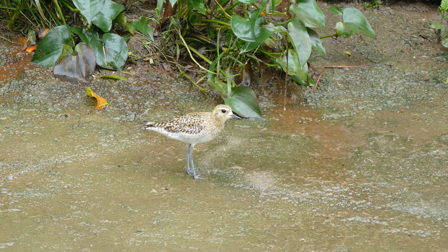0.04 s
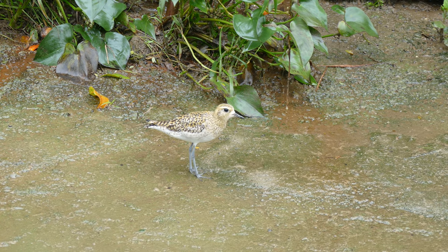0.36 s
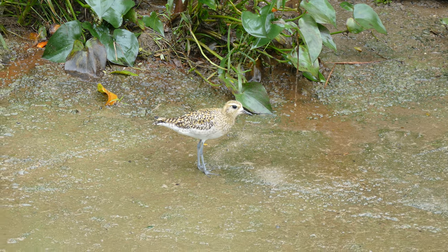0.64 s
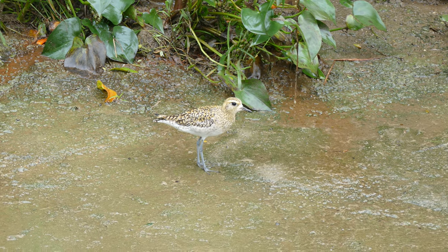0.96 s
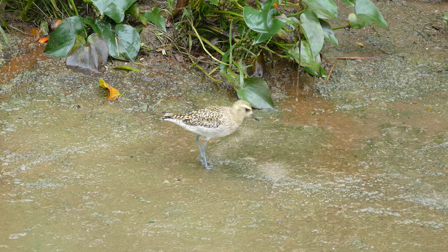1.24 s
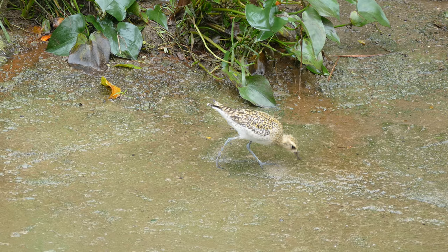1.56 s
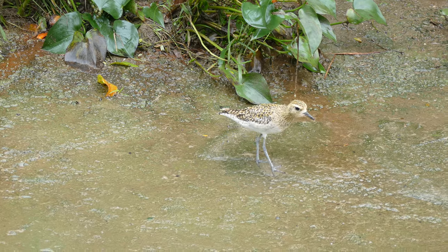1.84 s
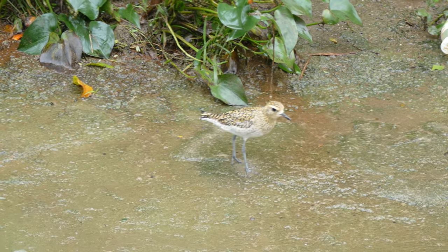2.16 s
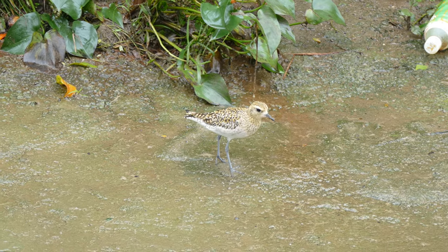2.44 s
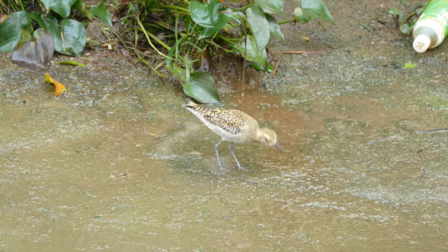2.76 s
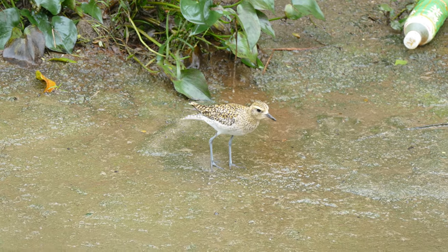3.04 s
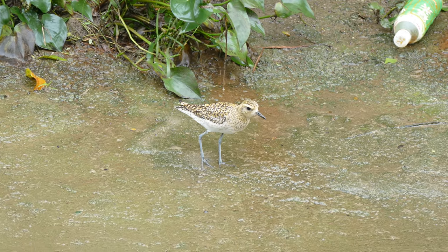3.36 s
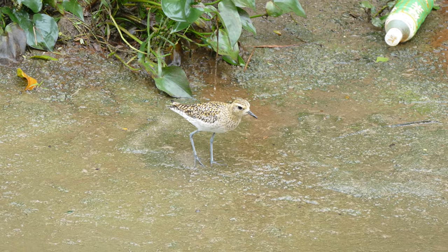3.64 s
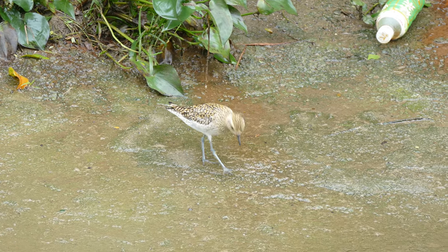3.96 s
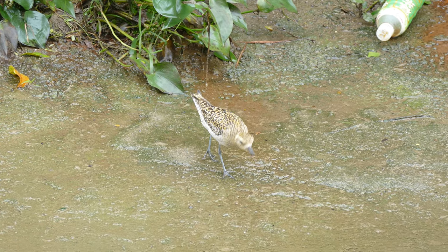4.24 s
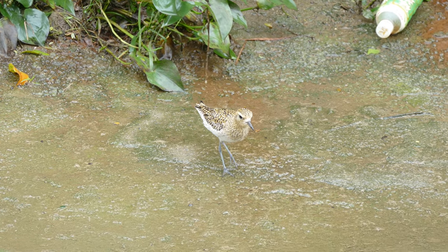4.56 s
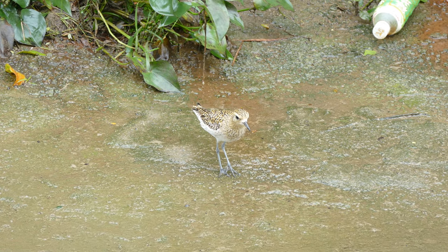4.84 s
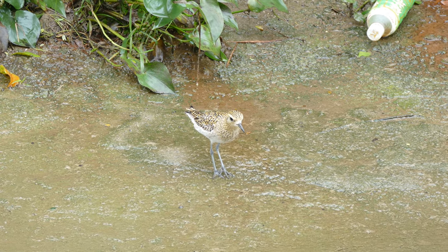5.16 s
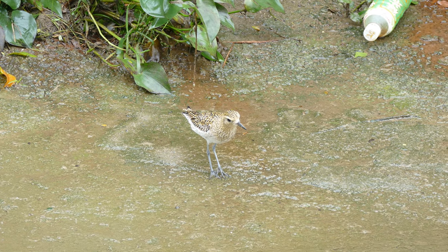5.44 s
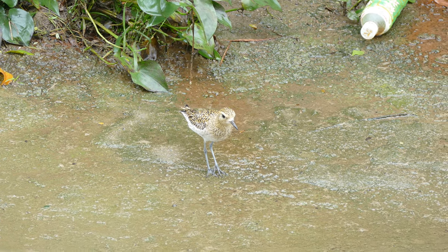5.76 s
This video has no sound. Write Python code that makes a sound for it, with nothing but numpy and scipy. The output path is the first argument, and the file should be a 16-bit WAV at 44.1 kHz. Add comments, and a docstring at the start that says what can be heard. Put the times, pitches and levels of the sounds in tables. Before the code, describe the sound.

A small wading bird calls outdoors, fairly near the microphone, starting with one soft whistle. Sharp chirps follow, each flicking up and sweeping down, at first alternating with slurred whistles, then coming alone, quicker and louder, echoing slightly off the yard. Sparse little ticks sound like drops or steps on wet ground. Behind it all are high shrilling insects, faint far calls, a soft hiss with two early rustles, and a dull distant roar and hum.

```python
"""A wet yard edged with plants, where a plover wades. From the start, insects shrill in the foliage over a
dull roar, a far hum and a faint hiss. Two rustles and faint far calls come first, then sparse wet ticks.
At 1.3 s a bird gives a soft slurred whistle. From 2.1 s it repeats sharp arched chirps, louder and closer
together, with whistles between the first five. Ground, leaves and a far wall echo each note."""
import sys
import numpy as np
from scipy import signal
from scipy.fft import rfft, irfft
from scipy.io import wavfile
from scipy.ndimage import uniform_filter1d

SR = 44100
rng = np.random.default_rng(int(sys.argv[2]) if len(sys.argv) > 2 else 0)


def unload_wav(signal):
    """Save mono or channel-first audio to the path in sys.argv[1] as 16-bit WAV at rate SR, clipped to [-1, 1]."""
    wavfile.write(
        sys.argv[1],
        SR,
        np.round(np.clip(np.atleast_2d(signal).T, -1, 1) * 32767).astype(np.int16),
    )


N = 264600
TIME = np.arange(N) / SR
BINS_HZ = np.maximum(np.fft.rfftfreq(N, 1 / SR), 1)
LEFT_RIGHT = np.array([[1], [-1]])


# Chirp contour: stage (-1 start, 0 top, 1 end), sweep_share, gain_db
CHIRP_CONTOUR = [(-1, 0, -16), (-.7, .12, -6), (-.38, .45, -1.5), (-.22, .88, -3.5), (0, 1, -3.5),
                 (.13, .92, -2), (.27, .71, 1), (.46, .52, -3), (.75, .27, -9.5), (1, -.04, -19)]
# Chirps: top_s, rise_s, fall_s, start_hz, top_hz, end_hz, level_db, slide (0 held, 1 gliding), sag_hz
BIRD_CHIRPS = [(2.142, 0.019, 0.046, 4650, 4690, 3430, -40, 0.77, 50),
               (3.030, 0.03, 0.067, 4085, 4880, 3010, -34, 0.8, 129),
               (3.748, 0.037, 0.056, 4120, 5010, 3100, -30, 0.79, 167),
               (4.325, .041, 0.059, 4700, 5420, 3000, -26.8, 0.32, 290),
               (4.915, 0.044, 0.056, 4610, 5370, 3120, -26.3, .04, 180),
               (5.223, .040, .059, 4290, 5030, 3120, -24.5, 0.96, 91),
               (5.53, 0.043, 0.056, 4500, 4890, 3030, -24, 0.51, -90),
               (5.837, 0.031, 0.069, 4010, 4540, 3000, -24, 1, 27)]

def chirps(waver=.007, top_waver=.012, rough_s=.012, top_throb_db=3, throb_s=.017, flutter_db=1.2):
    """A short opening note flicks up to a top where the voice breaks and pulses, then sweeps down."""
    stage, contour, contour_db = np.transpose(CHIRP_CONTOUR)
    rising, opening = stage < 0, stage < -.3
    bend = np.sin(np.pi * np.maximum(stage, 0))
    out = np.zeros(N)
    for top_s, rise_s, fall_s, start_hz, top_hz, end_hz, db, slide, sag_hz in BIRD_CHIRPS:
        from_top_s = stage * np.where(rising, rise_s, fall_s)
        foot_hz = np.where(rising, start_hz, end_hz)
        sweep = contour * np.where(opening, slide, 1)
        pitch_hz = foot_hz + sweep * (top_hz - foot_hz) - sag_hz * bend
        rough = waver + top_waver * np.exp(-(from_top_s / rough_s) ** 2)
        throb_db = top_throb_db * np.exp(-(from_top_s / throb_s) ** 2)
        out += note(top_s + from_top_s, pitch_hz, db + contour_db, rough, flutter_db, throb_db)
    return out


# Whistles, one list of points each: time_s, pitch_hz, level_db
WHISTLE_CURVES = [
    [(1.342, 3850, -53), (1.356, 4300, -45), (1.368, 4800, -46), (1.386, 5200, -41), (1.405, 5130, -42),
     (1.417, 4560, -41.5), (1.436, 4560, -46)],
    [(2.644, 4220, -44.5), (2.68, 3940, -48.5), (2.705, 4070, -50), (2.725, 3940, -47.5),
     (2.745, 3820, -51)],
    [(3.385, 3440, -50), (3.403, 3520, -37), (3.425, 2700, -48), (3.44, 3060, -46), (3.456, 3680, -33),
     (3.466, 3730, -40), (3.477, 3940, -34.5), (3.505, 3830, -43)],
    [(4.022, 3950, -39), (4.038, 3930, -31.5), (4.055, 3850, -37), (4.067, 3300, -33), (4.09, 3380, -36),
     (4.111, 3440, -34), (4.124, 3400, -42)],
    [(4.583, 3380, -39), (4.597, 3673, -36.5), (4.611, 3340, -31), (4.628, 3010, -38.5), (4.643, 3520, -36),
     (4.66, 3810, -35), (4.679, 3784, -31.5), (4.726, 3720, -39)],
]

def whistles(waver=.012, flutter_db=2.0):
    """The bird slurs from pitch to pitch, wavering as it goes."""
    return sum(note(*np.transpose(points), waver, flutter_db) for points in WHISTLE_CURVES)


def note(times, pitch_hz, level_db, waver, flutter_db, throb_db=0, throb_hz=95):
    """The bird's voice: a gliding, nearly pure tone; waver is jitter as a share of the pitch."""
    span = slice(int(times[0] * SR), int(times[-1] * SR))
    t, out = TIME[span], np.zeros(N)
    pitch_hz, level_db, waver, throb_db = (np.interp(t, times, np.broadcast_to(curve, len(times)))
                                           for curve in (pitch_hz, level_db, waver, throb_db))
    tremble = butter(rng.standard_normal((2, SR // 4)), "low", hz=220)
    jitter, flutter = rms_one(tremble)[:, :len(t)]
    hz = uniform_filter1d(pitch_hz, size=220) * (1 + waver * jitter)
    phase = 2 * np.pi * np.cumsum(hz) / SR
    tone = np.sin(phase) + from_db(-42) * np.sin(2 * phase) + from_db(-41) * np.sin(3 * phase)
    edge_s = np.minimum(t - times[0], times[-1] - t)
    gate = np.sin(np.pi / 2 * np.clip(edge_s / .004, 0, 1)) ** 2
    throb = np.sin(2 * np.pi * (throb_hz * t + rng.random())) - .5
    out[span] = np.sqrt(2) * gate * from_db(level_db + flutter_db * flutter + throb_db * throb) * tone
    return out


def yard(bird, wall_s=.1167, wall_db=-12):
    """Near surfaces thicken each note, foliage adds a tail, a far wall with ledges answers once."""
    near = scatter(start_s=.002, t60_s=.18, samples=1900, count=48)
    foliage = from_db(-5) * scatter(start_s=.033, t60_s=1.0, samples=22000, count=900)
    ledges = from_db(-12) * scatter(start_s=.102, t60_s=.76, samples=1400, count=40)
    mid = butter(near + foliage + ledges, "high", hz=3200, order=4)  # small scatterers favour treble
    mid[int(wall_s * SR)] += from_db(wall_db)
    side = from_db(-22) * scatter(start_s=.0016, t60_s=.75, samples=14000, count=500)
    return bird + signal.oaconvolve(bird[None], mid + side * LEFT_RIGHT, axes=1)[:, :N]


def scatter(start_s, t60_s, samples, count):
    """Decaying reflections of random sign, total energy 1."""
    delay_s = (np.arange(count) + rng.random(count)) * samples / count / SR
    arrivals = ((start_s + delay_s) * SR).astype(int)
    response = np.zeros(SR)
    response[arrivals] = rng.choice([-1, 1], count) * from_db(-60 * delay_s / t60_s)
    return response / np.sqrt(np.sum(response ** 2))


# Ticks: start_s, level_db (before filtering)
WET_TICKS = [(1.099, -35), (1.393, -30), (1.628, -28), (1.93, -33), (2.535, -41), (3.481, -28),
             (5.062, -38)]

def ticks(t60_s=.0091, band_hz=(2000, 7500)):
    """Tiny bright clicks, as of drops and steps on wet ground."""
    strikes = np.zeros(N)
    for start_s, db in WET_TICKS:
        strikes[int(start_s * SR)] = from_db(db)
    decay = from_db(-60 / (t60_s * SR))
    envelope = signal.lfilter([1], [1, -decay], strikes + 1e-18)
    return butter(envelope * rng.standard_normal(N), "band", band_hz)


# Far calls: centre_s, half_length_s, pitch_hz, width_hz, level_db
DISTANT_CALLS = [(0.153, 0.3, 2100, 300, -50), (0.872, 0.16, 2430, 110, -53), (1.003, 0.35, 2130, 600, -52),
                 (1.426, .06, 1955, 170, -46.5), (1.514, 0.033, 2480, 80, -47),
                 (1.581, 0.13, 1950, 170, -50), (1.789, .26, 2395, 70, -53.5),
                 (2.042, 0.043, 2290, 160, -48), (4.297, 0.58, 1545, 260, -51.5),
                 (5.149, .12, 1110, 200, -50.5), (5.529, 0.061, 2070, 260, -49.5)]

def far_calls():
    """Distance smears each call into a narrow noise band that swells and fades."""
    out = np.zeros(N)
    for centre_s, half_s, hz, width_hz, db in DISTANT_CALLS:
        on = abs(TIME - centre_s) < half_s
        ring = butter(rng.standard_normal(3 * SR), "band", [hz - width_hz / 2, hz + width_hz / 2])
        envelope = np.cos(np.pi / 2 * (TIME[on] - centre_s) / half_s) ** 2
        out[on] += from_db(db) * envelope * rms_one(ring)[-on.sum():]
    return out


# Choirs: pitch_hz, width_hz, level_db
INSECT_CHOIRS = [(7472, 390, -47.5), (8935, 525, -43), (10780, 620, -53)]

def insects(flicker_db=.71):
    """Many stridulations merge into one narrow band per choir; the highest is the most diffuse."""
    side = from_db(-17 + 12 * np.clip((BINS_HZ - 8400) / 3000, -.1, 1))
    return sum(from_db(db + flicker_db * drift(rate_hz=12)) * stereo_noise(resonance(hz, width_hz), side)
               for hz, width_hz, db in INSECT_CHOIRS)


# Hiss spectrum: frequency_hz, gain_db
HISS_SPECTRUM = [(60, -45), (300, -43), (800, 0), (1050, 1.5), (1300, 0.5), (1550, 3), (2000, 2),
                 (2600, 1.5), (4200, 1), (5300, -1.5), (6200, -4), (9000, -6.5), (12000, -16),
                 (15000, -29.5)]
# Hiss below the split: time_s, gain_db
HISS_LOW_GAIN = [(0, -2), (1.3, -0.5), (1.85, -1), (2.35, 0.5), (2.95, -2), (3.25, 0.5), (3.7, -0.8),
                 (4.4, -1), (6, 0)]
# Hiss above the split: time_s, gain_db
HISS_TREBLE_GAIN = [(0, 0.5), (.7, 0.5), (1.25, -0.5), (1.87, -2.5), (2.05, 0.5), (2.45, 1), (2.85, -2.5),
                    (3.3, 0.5), (3.7, -0.5), (4.4, 2), (6, 0.5)]
# Rustles: peak_s, treble_gain_db
HISS_RUSTLES = [(.17, 6.5), (.94, 4)]

def hiss(side, base_db=-43, split_hz=4200, low_share=.4):
    """An airy hiss that brief rustles lift and brighten."""
    air = from_db(base_db) * patchy_noise(colour(HISS_SPECTRUM), side)
    low = irfft(rfft(air) / (1 + (BINS_HZ / split_hz) ** 4), N)
    rustle_db = swells(HISS_RUSTLES, attack_s=.12, release_s=.25)
    treble = (air - low) * level(HISS_TREBLE_GAIN) * from_db(rustle_db)
    return treble + low * level(HISS_LOW_GAIN) * from_db(low_share * rustle_db)


# Roar spectrum: frequency_hz, gain_db
ROAR_SPECTRUM = [(30, -50), (60, -40), (100, -29.5), (150, -13.5), (200, -6), (290, 1), (500, 0.16),
                 (590, -1), (660, -3.5), (900, -12), (1500, -19.5), (3000, -64)]
# Roar envelope: time_s, level_db
ROAR_ENVELOPE = [(0, -46), (.9, -46.5), (1.7, -45.5), (3.7, -45.5), (4.2, -44.5), (6, -47.5)]

def roar(side):
    """A dull far roar that eases up and down."""
    return level(ROAR_ENVELOPE) * stereo_noise(colour(ROAR_SPECTRUM), side)


# Swells of the upper tone: peak_s, gain_db
UPPER_HUM_SWELLS = [(1.42, 12.5), (3.26, 5), (4.4, 8)]

def hum(side, upper_hz=764, lower_hz=574):
    """A far hum of two narrow noise bands: the upper swells now and then, the lower wavers."""
    upper_db = -57.5 + swells(UPPER_HUM_SWELLS, attack_s=.27, release_s=.087)
    upper = from_db(upper_db) * stereo_noise(resonance(upper_hz, width_hz=44), side)
    lower_db = -55 + 2 * drift(rate_hz=5.6)
    return upper + from_db(lower_db) * stereo_noise(resonance(lower_hz, width_hz=30), side)


# Stereo width: frequency_hz, side_minus_mid_db
STEREO_WIDTH = [(40, -10), (130, -19.5), (400, -22.5), (1200, -20.5), (4000, -21.5), (6500, -18),
                (10000, -8), (13000, -3)]

def surroundings():
    """Roar, hum and hiss, widest in the high treble."""
    side = colour(STEREO_WIDTH)
    return roar(side) + hum(side) + hiss(side)


def stereo_noise(gain, side):
    """Noise shared by both channels plus a weaker opposed part."""
    mid, across = irfft(rfft(rng.standard_normal((2, N))) * [gain, gain * side], N)
    return rms_one(mid + across * LEFT_RIGHT)


def patchy_noise(gain, side, depth_db=1.7, rate_hz=4.5, count=18):
    """Stereo noise in which each band swells and sinks on its own."""
    band_index = np.interp(np.log(BINS_HZ), np.log([800, 7000]), [0, count - 1])
    mid, across = rfft(rng.standard_normal((2, N))) * gain
    bands = (irfft(mid * np.maximum(1 - abs(band_index - k), 0), N) for k in range(count))
    patches = sum(band * from_db(depth_db * drift(rate_hz)) for band in bands)
    return rms_one(patches + irfft(across * side, N) * LEFT_RIGHT)


def drift(rate_hz, hop=200):
    """Slow random curve, rms 1."""
    pole = np.exp(-2 * np.pi * rate_hz * hop / SR)
    slow = signal.lfilter([1], [1, -2 * pole, pole ** 2], rng.standard_normal(N // hop + 502))[500:]
    return np.interp(np.arange(N) / hop, np.arange(len(slow)), rms_one(slow))


def swells(rows, attack_s, release_s):
    """Triangular swells in dB over time."""
    return sum(np.interp(TIME, [s - attack_s, s, s + release_s], [0, db, 0]) for s, db in rows)


def level(rows):
    """Gain over time from rows of time_s, gain_db."""
    return from_db(np.interp(TIME, *np.transpose(rows)))


def colour(rows):
    """Gain over frequency from rows of frequency_hz, gain_db."""
    hz, db = np.transpose(rows)
    return from_db(np.interp(np.log(BINS_HZ), np.log(hz), db))


def resonance(hz, width_hz):
    """Gain over frequency of a rounded peak."""
    return 1 / (1 + ((BINS_HZ - hz) / width_hz * 1.3) ** 2)


def butter(x, kind, hz, order=2):
    """Low-, high- or band-pass filter."""
    return signal.sosfilt(signal.butter(order, hz, kind, fs=SR, output="sos"), x)


def from_db(db):
    """Decibels to gain."""
    return 10 ** (np.asarray(db) / 20)


def rms_one(x):
    """Scale to rms 1."""
    return x / np.sqrt(np.mean(x ** 2) + 1e-20)


def scene():
    """The bird in its yard, over the background."""
    return yard(chirps() + whistles()) + far_calls() + insects() + surroundings() + ticks()


def record(dry, cutoff_hz=15200):
    """Steep low-pass."""
    return signal.sosfilt(signal.ellip(10, .1, 80, cutoff_hz, fs=SR, output="sos"), dry)


dry = scene()
out = record(dry)
unload_wav(out)
```